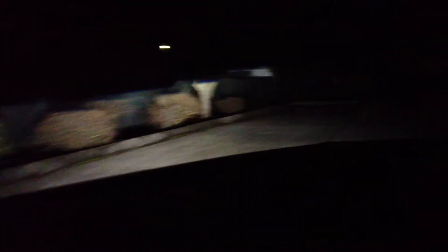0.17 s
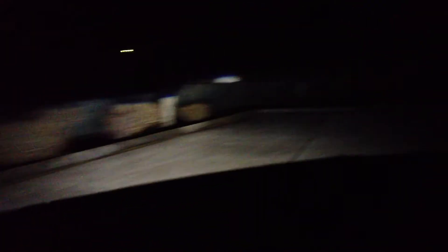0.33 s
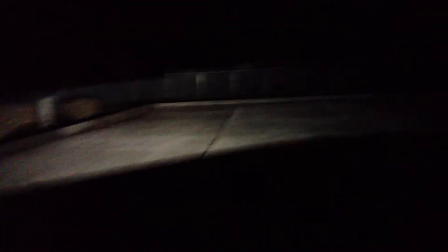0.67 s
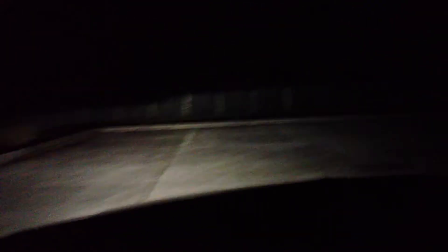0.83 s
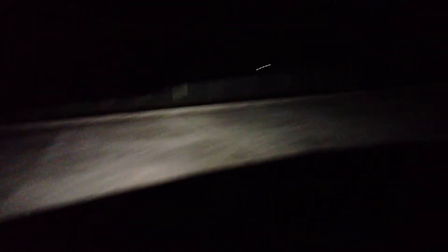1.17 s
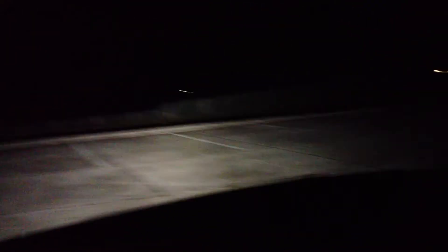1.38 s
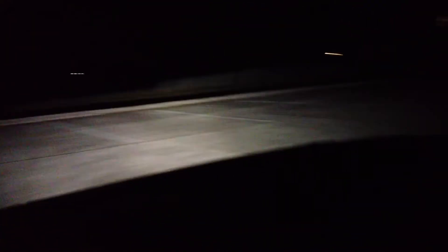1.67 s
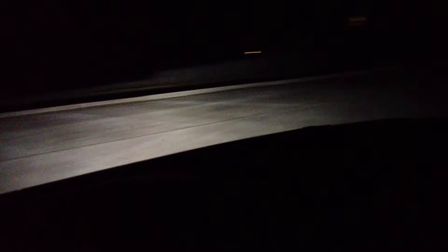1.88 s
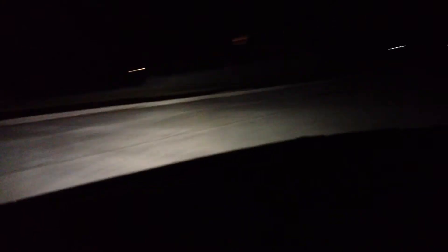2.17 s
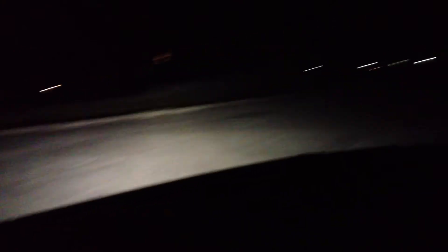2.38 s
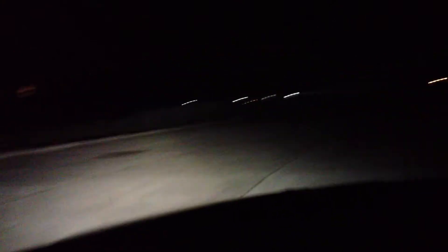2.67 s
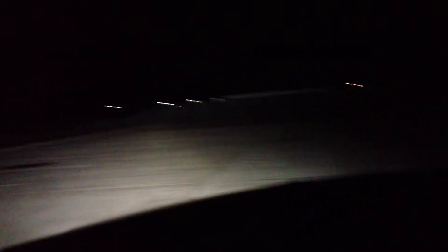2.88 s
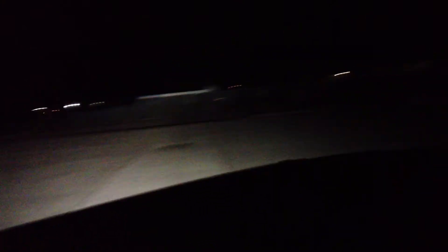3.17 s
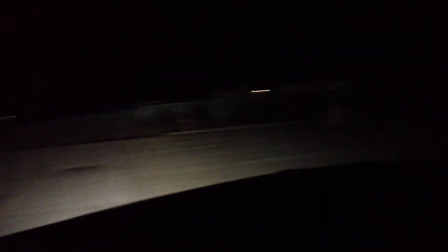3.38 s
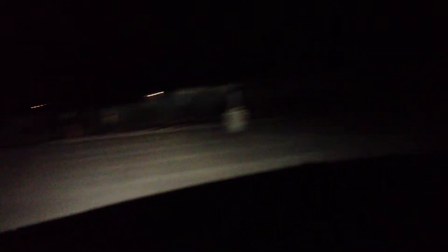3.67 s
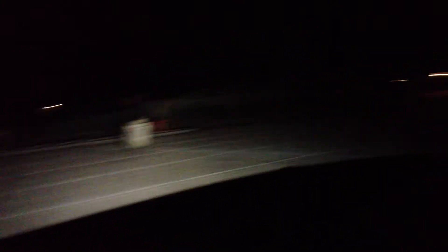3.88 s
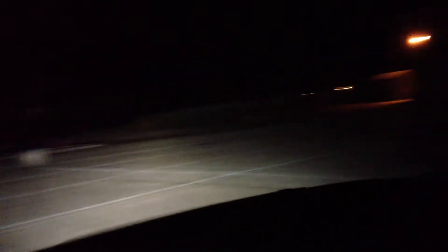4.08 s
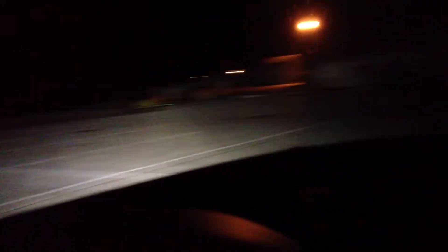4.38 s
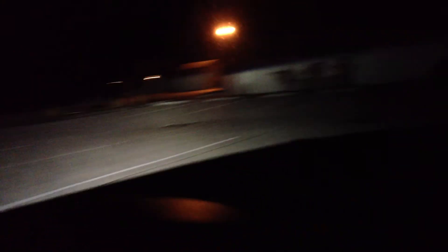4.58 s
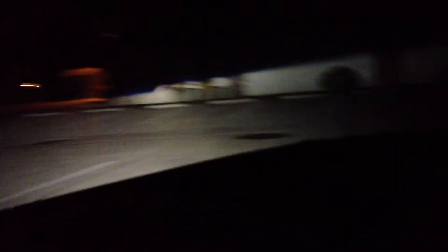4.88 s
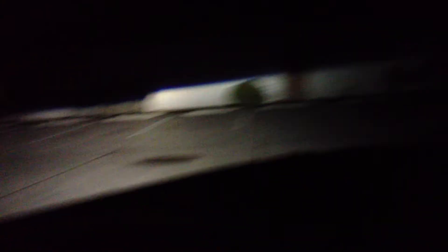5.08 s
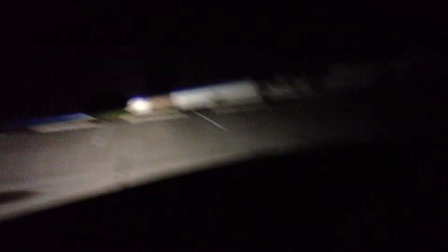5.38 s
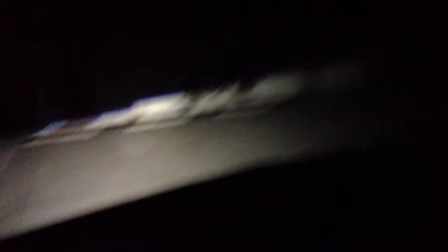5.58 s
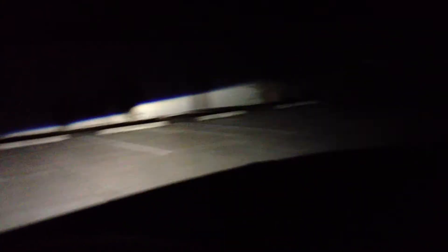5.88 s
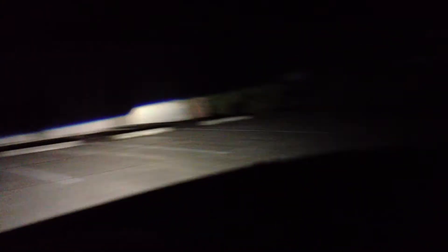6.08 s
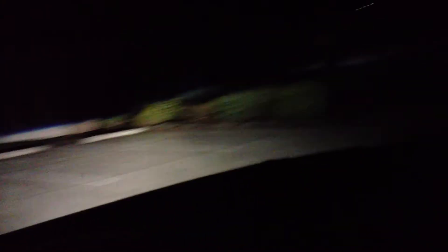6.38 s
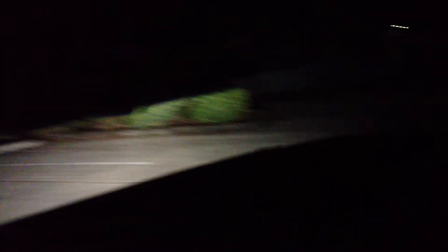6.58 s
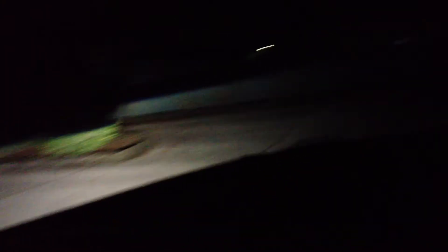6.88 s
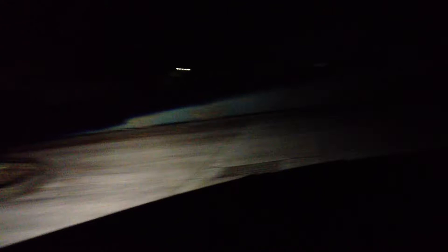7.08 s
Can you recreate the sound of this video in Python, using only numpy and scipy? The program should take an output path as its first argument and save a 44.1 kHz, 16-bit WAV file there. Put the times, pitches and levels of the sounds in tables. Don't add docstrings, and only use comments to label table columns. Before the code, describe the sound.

A close, dry car-interior sound: boomy road rumble, muted tyre hiss and a low bearing drone that fades and returns. Early slab joints give soft low bumps. About a second and a half in, a control stalk snaps with a bright, hard crack and then releases in a rattling click. The rest dips and recovers, while loose trim taps, cloth rubs and small stones tick until the end.

```python
import sys
import numpy as np
from scipy import signal
from scipy.fft import rfft, irfft
from scipy.io import wavfile
from scipy.ndimage import uniform_filter1d

SR = 44100
rng = np.random.default_rng(int(sys.argv[2]) if len(sys.argv) > 2 else 0)


def makeup_ratio(level_db):
    decades = np.asarray(level_db, float) / 20
    return 10 ** decades


def store_pcm(level_fs):
    pcm = np.round(np.clip(level_fs, -1, 1) * 32767).astype(np.int16)
    wavfile.write(sys.argv[1], SR, np.atleast_2d(pcm).T)


N = 318843
T = np.arange(N) / SR

# time in seconds, speed in Hz (turns per second).
SHAFT_SPEED = [(0, 44.1), (.6, 44.1), (1.2, 45.4), (1.8, 47.5), (2.4, 49.8), (3, 51.9), (3.6, 52.9),
               (4.2, 54.2), (4.5, 54.8), (5.1, 54.1), (5.6, 54.7), (6, 54.2), (6.6, 52.5), (7.23, 51.5)]
# start in seconds, peak in dB, brightness in dB per octave.
TRIM_KNOCKS = [(1.1435, -38.5, 7), (1.1605, -43, 6), (1.1855, -41.5, 5), (1.9943, -37.5, 1),
               (2.254, -37.5, 1), (2.539, -36.5, 1), (2.5763, -37, -2), (2.643, -36, -3),
               (3.199, -35, -0.5), (3.2947, -42.5, 3), (3.6, -32.5, -2.5), (3.943, -33, 1),
               (4.4107, -32, 2), (5.091, -32, -4), (5.525, -32.5, -3)]


def evened(x):
    return x / np.sqrt(np.mean(x ** 2) + 1e-20)


def columns(rows):
    s, *values = np.transpose(rows)
    return [np.interp(T, s, v) for v in values]


def coloured(size, colour):
    hz, db = np.transpose(colour)
    bins = np.fft.rfftfreq(size, 1 / SR)
    gain = makeup_ratio(np.interp(np.log(bins + 1), np.log(hz + 1), db))
    return evened(irfft(rfft(rng.standard_normal(size)) * gain, size))


def resonate(x, hz, width):
    turn = np.exp(2j * np.pi * hz * np.arange(len(x)) / SR)
    r = np.exp(-np.pi * np.clip(width, 5, 9000) / SR)
    smooth = signal.lfilter([(1 - r) ** 2], [1, -2 * r, r * r], x / turn)
    return 2 * (turn * smooth).real


def modes(x, table):
    return sum(makeup_ratio(db) * evened(resonate(x, hz, width)) for hz, width, db in table)


def drift(hz):
    return evened(signal.lfilter(*signal.butter(2, hz, fs=SR), rng.standard_normal(N)))


def add(mix, s, sound):
    part = mix[round(s * SR):][:len(sound)]
    part += sound[:len(part)]


def blow(t60, rise):
    t = np.arange(6000) / SR
    return t, (1 - np.exp(-t / rise)) * makeup_ratio(-60 * t / t60)


def burst(noise, shape):
    return evened(noise * shape) * np.sqrt(np.mean(shape ** 2))


def rustle(size, hz, wide_db):
    # frequency in Hz, density in dB per Hz.
    dull_colour = [(530, 0), (900, -10), (1600, 0.5), (2030, -0.5), (3320, -6.5), (4600, -3), (10300, -21),
                   (13000, -30), (15800, -34)]
    noise = coloured(size, dull_colour)
    return evened(evened(resonate(noise, hz, min(.4 * hz, 3500))) + makeup_ratio(wide_db) * noise)


def hiss():
    # time in seconds, level in dB.
    hiss_level = [(0, -58), (.5, -53), (1.44, -52), (2, -58), (3.3, -55.5), (4.1, -54), (4.7, -54),
                  (5.5, -53.5), (6.3, -54.5), (7.23, -57)]
    # frequency in Hz, density in dB per Hz.
    hiss_colour = [(350, -30.5), (600, -9), (642, -6.5), (845, -7.5), (1210, -16), (1330, -12), (2140, -15),
                   (2780, -16), (3510, -17.5), (5070, -22.5), (6400, -26.5), (8800, -31.5), (9600, -41),
                   (11000, -41), (13000, -38.5), (15200, -39), (15800, -53)]
    level_db = columns(hiss_level)[0]
    lift_db = 3.5 + .8 * (level_db - level_db.mean())
    _, _, z = signal.stft(coloured(N, hiss_colour), SR, nperseg=512)
    patches = uniform_filter1d(rng.standard_normal(z.shape), 14, 0)
    patches = evened(uniform_filter1d(patches, 12, 1))
    noise = evened(signal.istft(z * makeup_ratio(.9 * patches), SR, nperseg=512)[1][:N])
    treble = signal.lfilter(*signal.butter(2, 6000, "high", fs=SR), noise)
    grit_per_s = 19
    sizes = makeup_ratio(2.7 * np.minimum(rng.exponential(1, N), 2.5))
    hits = (rng.random(N) < grit_per_s / SR) * sizes
    grit = signal.oaconvolve(hits, blow(0.035, .0004)[1])[:N]
    lift = makeup_ratio(lift_db) * (1 + 0.55 * grit) - 1
    return makeup_ratio(level_db + drift(30)) * (noise + lift * treble)


def shaking():
    # time in seconds, coarseness in dB.
    surface = [(0, -1), (.35, 1), (.85, 5), (1.1, 1.5), (1.5, 1), (2.2, 0), (2.65, 0.5), (3.5, 0.5),
               (4.1, 1), (4.6, -1), (5, 0.5), (5.6, 1), (6.1, -2), (6.5, -2), (7.05, -0.5), (7.23, 2.5)]
    # centre in seconds, lift in dB, length in seconds.
    bumps = [(0.01, 17.5, 0.31), (0.232, 19.5, 0.12), (0.388, 13.5, 0.27), (0.61, 11, 0.19),
             (0.796, 19.5, 0.052), (1.14, 6, 1), (1.447, 4, 0.2), (2.26, 5, 0.2), (2.95, 3.5, .2),
             (3.853, 2, 0.12), (4.54, 2, 0.22), (5.195, 2.5, 0.1), (5.603, 8, 0.28), (6.725, 6, 0.23),
             (7.054, 7.5, 0.24)]
    # level in dB, share of coarseness in dB per dB, speed effect in dB per Hz,
    # share of a bump in dB per dB.
    layers = [
        (-45.5, 0.25, 0.15, 0.74),
        (-44, 0.25, 0.55, 0.14),
        (-44.5, 1.2, 0.45, 0.038),
        (-59, 0.74, 0.85, 0.45),
    ]
    cruise_hz = 50
    coarse_db = columns(surface)[0]
    faster = columns(SHAFT_SPEED)[0] - cruise_hz
    bump_db = 0
    for s, db, length in bumps:
        bump_db = bump_db + db * np.cos(np.pi * np.clip((T - s) / length, -.5, .5)) ** 2
    return [db + a * coarse_db + b * faster + c * bump_db for db, a, b, c in layers]


def road():
    # frequency in Hz, width in Hz, level in dB.
    low_air = [(126.1, 27, 4.5), (137.5, 34, 0), (100, 32, -14.5)]
    high_air = [(179, 19, 6), (165, 15, 3.5), (151.2, 18, -5), (219.6, 14, -5)]
    panels = [(269, 35, -1), (291.6, 35, 1), (322.6, 29, -3.5), (398.3, 45, -4), (425, 30, -11),
              (495, 60, -9), (585, 46.5, -9), (704, 132, -13.5)]
    # frequency in Hz, density in dB per Hz.
    deep_colour = [(12, -66), (20, -42), (34, -29), (59, -22), (75, -19), (110, -4), (140, -26),
                   (240, -120)]
    low_db, high_db, body_db, deep_db = shaking()
    shake = rng.standard_normal((3, N))
    lumps = makeup_ratio(2.6 * drift(18))
    low = makeup_ratio(low_db) * evened(modes(shake[0] * lumps ** .6, low_air))
    high = makeup_ratio(high_db + 2.0) * evened(modes(shake[1] * lumps ** 0.28, high_air))
    body = makeup_ratio(body_db - 1.56) * evened(modes(shake[2] * lumps, panels))
    under = signal.butter(4, 85, "high", fs=SR, output="sos")
    return signal.sosfilt(under, low + high + body) + makeup_ratio(deep_db + 2.0) * coloured(N, deep_colour)


def hum():
    # time in seconds, engine pull in dB, load on the bearing in dB.
    effort = [(0, 3, -2), (.6, -3, -14), (1.25, 0, -2), (1.65, -6, -8), (1.95, -2, 4), (2.4, -2, 1),
              (2.9, 0, 0.5), (3.3, 1.5, -5), (3.6, 4, -1), (4.1, 2, -1), (4.45, 0, 1), (4.75, -16, -12),
              (5.05, -9, 8), (5.5, -7, 9), (6, -5, 7), (6.45, -3, 9), (6.7, -8, 0), (7.23, -10, 3)]
    # level in dB, share of the load in dB per dB.
    bearing = [
        (-45, 0.64),
        (-62, 0.49),
        (-55, 0.14),
    ]
    engine_db = -61.5
    turns = 2 * np.pi * np.cumsum(columns(SHAFT_SPEED)[0] * (1 + .003 * drift(5))) / SR
    pull_db, load_db = columns(effort)
    levels = [engine_db + pull_db] + [db + share * load_db for db, share in bearing]
    out = np.zeros(N)
    for order, db in zip((1, 3, 4, 5), levels):
        out += makeup_ratio(db + 1.8 * drift(10.66)) * np.sin(order * turns)
    return np.sqrt(2) * out


def thuds():
    # start in seconds, peak in dB, ring in Hz.
    suspension = [(0.263, -40, 540), (0.696, -40, 570), (.74, -37, 290), (0.829, -41, 290),
                  (4.048, -36, 320), (4.201, -57, 317), (4.71, -39, 318), (2.068, -42, 560),
                  (1.99, -42, 420), (1.126, -45, 690), (1.801, -31, 685), (2.441, -40, 417),
                  (2.606, -32.5, 427), (2.768, -44, 511), (2.993, -39, 425), (3.067, -40, 430),
                  (3.295, -41, 527), (3.655, -37.5, 415), (3.724, -45, 560), (3.96, -36, 495),
                  (3.115, -41, 430), (3.7, -39, 446), (4.159, -37, 516), (4.37, -33.5, 304),
                  (4.505, -37, 307), (4.814, -39.5, 560), (4.961, -36.5, 495), (5.256, -52, 426),
                  (5.608, -37, 607), (5.632, -35, 540), (6.306, -44, 564), (7.058, -38, 585)]
    out = np.zeros(N)
    for s, db, hz in suspension:
        t, shape = blow(0.14, 0.0015)
        noise = np.diff(rng.standard_normal(len(t)), prepend=0)
        add(out, s - .002, makeup_ratio(db - 1.0) * burst(resonate(noise, hz, 227), shape))
    return out


def scuffs():
    # start in seconds, rms in dB, length in seconds.
    cloth = [(0.262, -58, .092), (0.584, -53, 0.023), (1.253, -50, 0.052), (1.645, -38, 0.037),
             (2.581, -53.5, 0.055), (2.755, -58, 0.072), (3.408, -52, 0.036), (4.023, -53, 0.056),
             (4.572, -56, 0.029)]
    # start in seconds, rms in dB, length in seconds, centre in Hz.
    scrapes = [(0.336, -54, 0.072, 3550), (.772, -66, 0.19, 2550), (1.206, -56, 0.04, 1420),
               (1.254, -56.5, 0.42, 7000), (1.251, -58.5, 0.44, 13000), (1.627, -56, 0.32, 13700),
               (1.601, -52.5, 0.16, 7450), (2.93, -53.5, 0.011, 7700), (3.093, -63, .02, 15200),
               (3.297, -61.5, 0.078, 1590), (3.311, -48, 0.14, 550), (3.95, -45.5, 0.029, 2360),
               (3.966, -55, 0.053, 1580), (3.286, -55, 0.031, 3430), (3.323, -72, 0.031, 3200),
               (2.599, -50, 0.047, 1600), (6.298, -69, 0.23, 9900), (4.127, -46, 0.048, 840),
               (4.333, -52.5, 0.034, 1590), (4.953, -52.5, 0.047, 3090), (5.621, -53, 0.029, 540)]
    out = np.zeros(N)
    rows = [(*row, 4860, 33) for row in cloth]
    rows += [(*row, -3.5) for row in scrapes]
    for s, db, length, hz, wide_db in rows:
        noise = rustle(SR // 2, hz, wide_db)
        grains = makeup_ratio(2.8 * evened(uniform_filter1d(rng.standard_normal(len(noise)), 90)))
        sound = (noise * grains)[:round(length * SR)]
        add(out, s, makeup_ratio(db) * burst(sound, signal.windows.tukey(len(sound), .7)))
    return out


def pings():
    # start in seconds, peak in dB.
    stones = [(0.4189, -57), (0.492, -45), (1.053, -63), (1.1243, -53), (1.27, -52),
              (2.9311, -52), (3.03, -47), (3.0952, -56), (3.3746, -57), (3.5986, -51), (3.9413, -64),
                    (4.1573, -47.5), (4.4097, -52), (5.0906, -46.5), (5.188, -50), (5.523, -45),
                    (5.6055, -58), (5.8879, -56), (5.9612, -55.5), (6.0101, -57), (6.1243, -53)]
    out = np.zeros(N)
    top = signal.butter(2, 7500, "high", fs=SR)
    for s, db in stones:
        t, shape = blow(.045, 0.00054)
        noise = signal.lfilter(*top, rng.standard_normal(len(t)))
        add(out, s - .001, makeup_ratio(db - 2.5) * burst(noise, shape))
    return out


def ticks():
    # start in seconds, peak in dB, centre in Hz, wide part in dB.
    thin_ticks = [(0.346, -42, 3820, -3), (.361, -35, 3540, 6), (0.4893, -38, 2180, 11),
                  (.9048, -44, 2270, -7), (1.046, -36, 920, -4), (1.0532, -33.5, 1820, 25),
                  (1.1255, -36, 1690, 3), (1.412, -34, 2300, -3), (2.04, -41.5, 1640, 8),
                  (2.071, -45, 1154, 6), (2.1865, -42, 1500, 6), (2.869, -41, 1050, -2),
                  (2.931, -44.5, 2560, -2), (3.0297, -44, 6000, -2), (3.094, -43.5, 2660, 15),
                  (3.3748, -36.5, 1570, 24), (.538, -47, 7100, -2), (3.3955, -51, 5000, 13),
                  (3.416, -38.5, 1000, 0), (2.613, -43, 3100, 7), (4.053, -36.5, 900, -3),
                  (4.154, -35, 1500, 2), (3.961, -39, 1300, 2), (4.8726, -34, 2600, -2),
                  (1.62, -27, 2250, 3), (5.2063, -38.5, 1900, -11), (5.49, -42, 5500, 6),
                  (5.6061, -34, 1600, 2), (5.593, -44, 3800, 0), (5.287, -45, 3000, 8),
                  (5.868, -46, 6000, 5), (5.6552, -43, 1460, 17), (6.7412, -39, 1270, 11),
                  (7.208, -44, 2690, 2.5)]
    # centre in Hz, wide part in dB, level over the knock in dB.
    contact = [(6200, 16, -20.5)]
    harder = 2.2
    out = np.zeros(N)
    contacts = []
    for s, db, _ in TRIM_KNOCKS:
        for hz, wide_db, over_db in contact:
            contacts.append((s, db + over_db + (harder - 1) * (db + 44), hz, wide_db))
    for s, db, hz, wide_db in thin_ticks + contacts:
        t, shape = blow(0.067, .0004)
        add(out, s - .001, makeup_ratio(db - 5.0) * burst(rustle(len(t), hz, wide_db), shape))
    return out


def clinks():
    # start in seconds, peak in dB, frequency in Hz, t60 in seconds.
    hard_parts = [(1.0463, -32, 910, 0.019), (1.125, -43, 3670, .03), (1.6195, -33, 2400, .04),
                  (1.622, -33, 2950, .05), (1.6225, -38, 2159, .12), (1.8405, -42, 2960, .08),
                  (1.8035, -22, 4150, .035), (1.8165, -27, 2900, .04), (1.4645, -23.5, 4860, .03),
                  (1.453, -40.5, 2000, .03), (1.854, -39, 1850, .04), (1.861, -38, 2990, .04),
                  (1.862, -41, 1830, .035), (1.876, -42, 1900, .04), (1.877, -46, 2990, .04),
                  (1.889, -42, 3010, .05), (1.888, -46, 1950, .04), (1.899, -53, 7200, .08),
                  (2.785, -50, 3300, .07), (2.785, -52, 4800, .06), (2.932, -46, 2450, .03),
                  (4.965, -50, 3100, .06), (4.873, -42, 2196, .035), (4.874, -42, 2700, .035),
                  (4.873, -42, 4974, .02), (5.607, -39, 3250, .03), (5.607, -40, 1750, .03),
                  (5.526, -44, 4818, .035), (5.526, -42, 7100, .03), (1.518, -36, 4100, .04),
                  (1.522, -36, 2700, .06), (1.621, -38, 4800, .03), (3.961, -41, 2400, .03),
                  (4.156, -42, 1900, .03), (2.1855, -42, 900, 0.023), (2.601, -49, 3090, 0.1),
                  (3.0295, -45, 5000, 0.068), (3.0565, -51, 3500, .04), (3.0955, -51, 15100, 0.054),
                  (3.3745, -45, 4300, .02), (3.375, -40, 5400, .02), (.3495, -33, 1620, 0.025),
                  (.3615, -45, 3530, 0.14), (.4215, -50, 4500, .03), (1.151, -41, 1410, .08),
                  (1.169, -44, 1410, .08), (1.195, -49, 1410, 0.088), (3.9605, -46.5, 4900, 0.056),
                  (4.1535, -53, 4680, .05)]
    split = 0.018
    out = np.zeros(N)
    for s, db, hz, t60 in hard_parts:
        t, shape = blow(t60, 0.00096)
        pair = np.sin(2 * np.pi * hz * t) + 0.2 * np.sin(2 * np.pi * hz * (1 + split) * t)
        add(out, s, makeup_ratio(db) * shape * pair)
    return out


def knocks():
    # frequency in Hz, level in dB, t60 in seconds, rise in seconds, delay in seconds.
    piece_modes = [(1068, 2, .035, .002, .003), (1166, 9, .036, .0012, .0022), (1330, 0, .03, .002, .007),
                   (1410, 4, .055, .002, .008), (1500, 11, .016, .0005, 0.0002),
                   (1560, 6, .025, .0009, 0.0002), (1860, 6, .02, .001, .001),
                   (3200, -8, .015, .0009, 0.0002), (5000, -18, .03, .0005, 0.0002),
                   (6000, -6, .007, .0004, 0.0002)]
    out = np.zeros(N)
    hz, mode_db, t60, rise, delay = np.transpose(piece_modes)[:, :, None]
    t = np.maximum(np.arange(6000) / SR - delay, 0)
    shape = (1 - np.exp(-t / rise)) * makeup_ratio(-60 * t / t60)
    for s, db, tilt_db in TRIM_KNOCKS:
        tilt = tilt_db * np.log2(hz / 1400)
        share = makeup_ratio(mode_db + tilt + 1.5 * rng.standard_normal(hz.shape))
        detune = 1 + .012 * rng.standard_normal(hz.shape)
        ring = share * np.sin(2 * np.pi * hz * t * detune) * shape
        add(out, s, makeup_ratio(db + 6.8) * ring.sum(0) / np.linalg.norm(share))
    return out


def snap(blows, colour, rings, ring_db):
    out = np.zeros(N)
    hz, mode_db, ring_t60 = np.transpose(rings)[:, :, None]
    for s, db, t60 in blows:
        t, shape = blow(t60, 0.00037)
        _, fade = blow(ring_t60, 0.00043)
        ring = makeup_ratio(mode_db) * np.sin(2 * np.pi * (hz * t + rng.random(hz.shape))) * fade
        crack = burst(coloured(len(t), colour), shape)
        add(out, s - .0005, makeup_ratio(db - 6.5) * (crack + makeup_ratio(ring_db) * ring.sum(0)))
    return out


def stalk_switch():
    # start in seconds, peak in dB, t60 in seconds.
    press = [
        (1.4618, -14, 0.05),
        (1.4648, -10.5, 0.025),
        (1.4705, -24, 0.044),
    ]
    slide = [
        (1.5145, -22, 0.12),
        (1.523, -30, 0.082),
        (1.530, -38.5, 0.064),
        (1.619, -28, 0.05),
    ]
    over = [
        (1.5644, 2, 0.056),
        (1.5705, -11.5, 0.06),
    ]
    back = [
        (1.7998, -12.5, 0.039),
        (1.8029, -8.5, 0.026),
        (1.8128, -8.5, 0.041),
        (1.8177, -6.5, 0.014),
        (1.8254, -11, 0.016),
        (1.831, -18.5, 0.036),
        (1.8444, -26.5, 0.049),
        (1.8614, -39, 0.15),
    ]
    # frequency in Hz, density in dB per Hz.
    press_colour = [(290, -50.5), (500, -30), (613, -21), (1430, -10.5), (1920, -1.5), (2840, -16.5),
                    (4810, -10.5), (5560, -19.5), (6070, -12), (8000, -15), (9000, -30), (14600, -42),
                    (16400, -72)]
    slide_colour = [(290, -30), (500, -10), (1120, -11), (1730, -21.5), (1970, -4), (2460, -10.5),
                    (5320, -16), (7500, -16), (9500, -33), (13500, -35), (16400, -56.5)]
    over_colour = [(290, -56.5), (500, -23.5), (1730, -13), (2120, -10.5), (2320, -14.5), (3010, -15),
                   (5020, -5.5), (5400, -11), (7450, -2), (8200, -9), (9270, -16), (14800, -13),
                   (15500, -24.5), (16400, -58)]
    back_colour = [(290, -62), (500, -35), (641, -32), (1120, 2), (1250, -8), (2180, 0.5), (2600, -6),
                   (2930, -2), (3150, -13), (4150, -1), (5800, -7), (7890, -3), (9200, -14), (13000, -13),
                   (15500, -18), (16400, -83)]
    # frequency in Hz, level in dB, t60 in seconds.
    press_rings = [(1900, -4, .035), (2060, -5, .03), (4620, -3, .03), (4890, -1, .035), (6010, -9, .03)]
    slide_rings = [(2100, -2, 0.092), (2316, 0, 0.14), (4870, -12, .06)]
    over_rings = [(2342, -9, .02), (4064, -2, .045), (5044, -10, .06), (5825, -1, .025), (6422, -8, .05),
                  (7300, -6, .05), (7560, -6, .035), (8037, -8, .04), (9900, -13, .035), (11230, -10, .035),
                  (11980, -9, .03), (13130, -8, .04), (13530, -9, .03), (14970, -14, .04)]
    back_rings = [(2258, -1, .055), (2112, -3, .045), (2860, -6, .05), (3010, -7, .06), (4140, -4, .035),
                  (1080, -10, .04), (5070, -7, .06), (6680, -5, .035), (6955, -5, .04), (7200, -21, .17),
                  (7890, -6, .04), (4790, -10, .07), (2595, -12, .07), (1814, -14, .08)]
    out = snap(press, press_colour, press_rings, -1.03)
    out += snap(slide, slide_colour, slide_rings, -8.5)
    out += snap(over, over_colour, over_rings, -10)
    return out + snap(back, back_colour, back_rings, -9)


def cabin(x, wet_db):
    t, shape = blow(0.18, 0.002)
    noise = rng.standard_normal((3, len(t)))
    tails = signal.lfilter([1], [1, -.4], noise * shape)
    turn = np.cos(2 * np.pi * (71 * T + np.arange(3)[:, None] / 3))
    wet = signal.oaconvolve(x * turn, tails / np.linalg.norm(tails[0]), axes=1).sum(0)[:N]
    return x + makeup_ratio(wet_db) * wet


def scene():
    switch = stalk_switch()
    mix = hiss() + road() + hum()
    mix += cabin(thuds() + scuffs() + ticks() + pings(), -15.0)
    mix += cabin(knocks() + clinks(), -24)
    mix += cabin(switch, -17.5)
    edge = signal.firwin(801, 15520, window=("kaiser", 8), fs=SR)
    inside = signal.oaconvolve(.9 * np.tanh(mix / .9), edge, "same")
    beyond = switch - signal.oaconvolve(switch, edge, "same")
    return (inside + .022 * beyond)[None]


def top_cut(x):
    return signal.sosfilt(signal.butter(12, 16530, fs=SR, output="sos"), x)


def record(dry):
    power_db = 10 * np.log10(abs(uniform_filter1d(dry[0] ** 2, 300)) + 1e-12)
    fall = T * 20.0
    held_db = np.maximum.accumulate(power_db + fall) - fall
    over_db = np.maximum(held_db + 21.0, 0)
    r = np.exp(-1 / (0.019 * SR))
    ducked = dry / makeup_ratio(0.53 * signal.lfilter([1 - r], [1, -r], over_db))
    return top_cut(ducked)


dry = scene()
out = record(dry)
store_pcm(out)
```